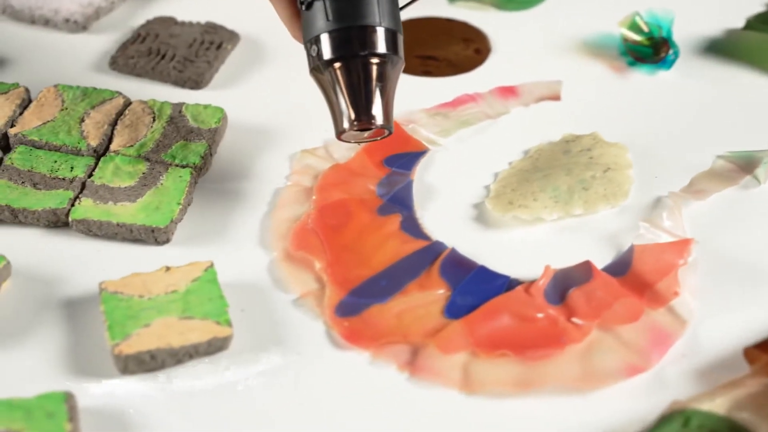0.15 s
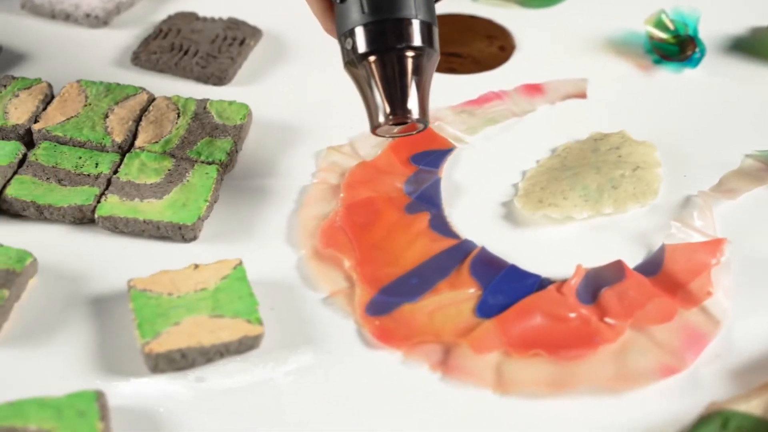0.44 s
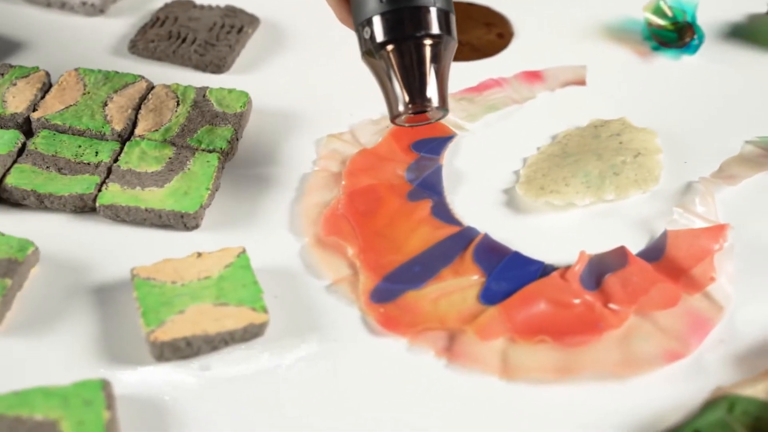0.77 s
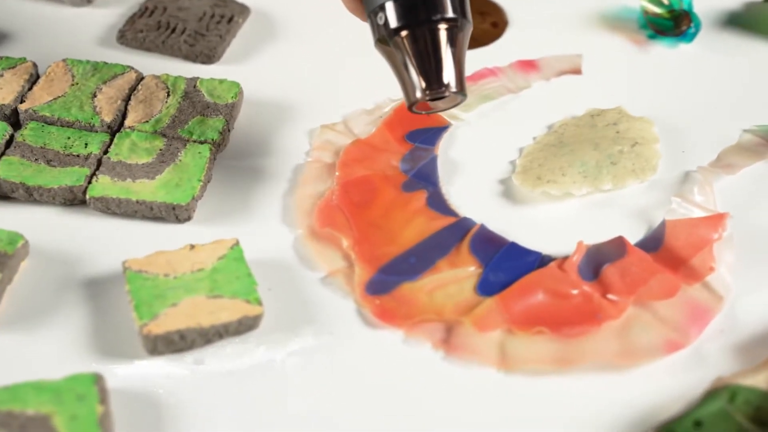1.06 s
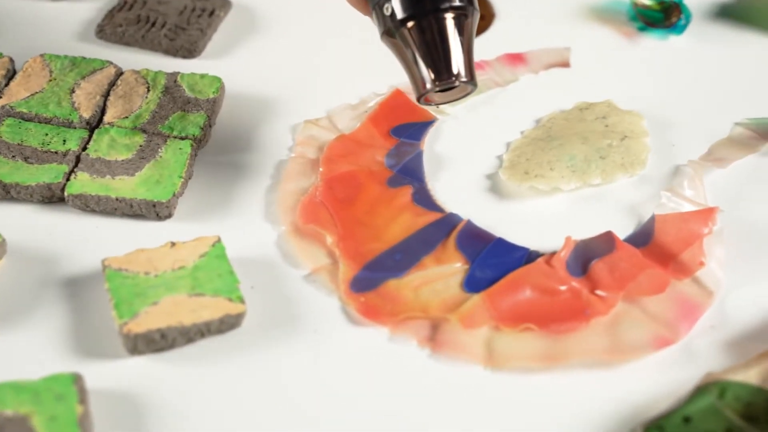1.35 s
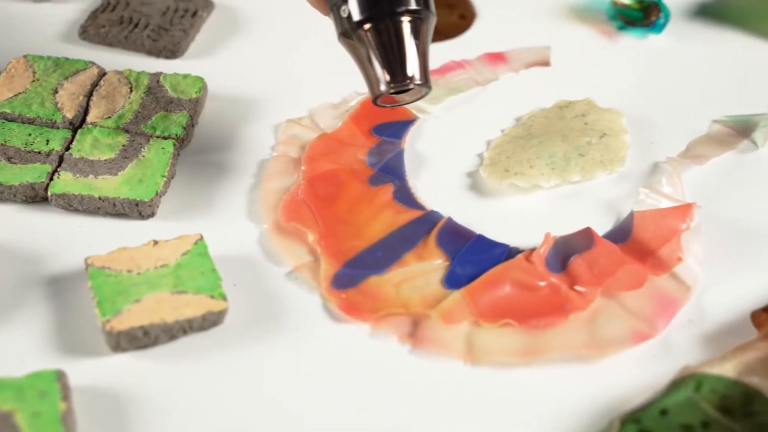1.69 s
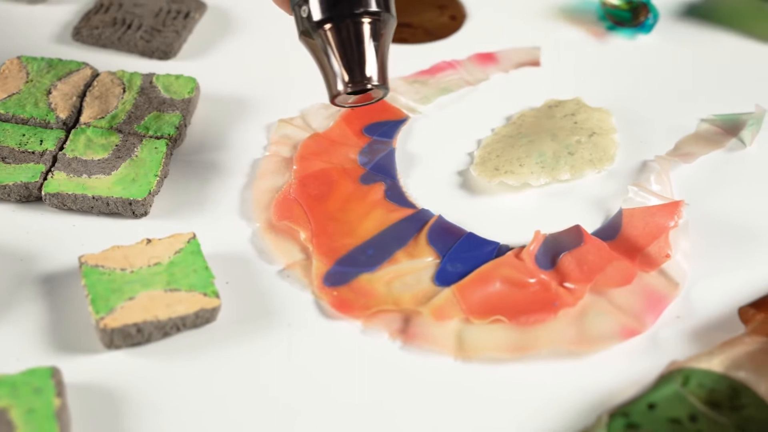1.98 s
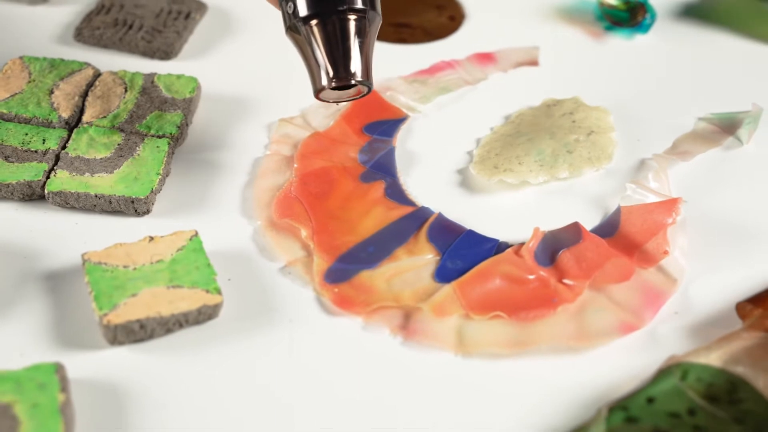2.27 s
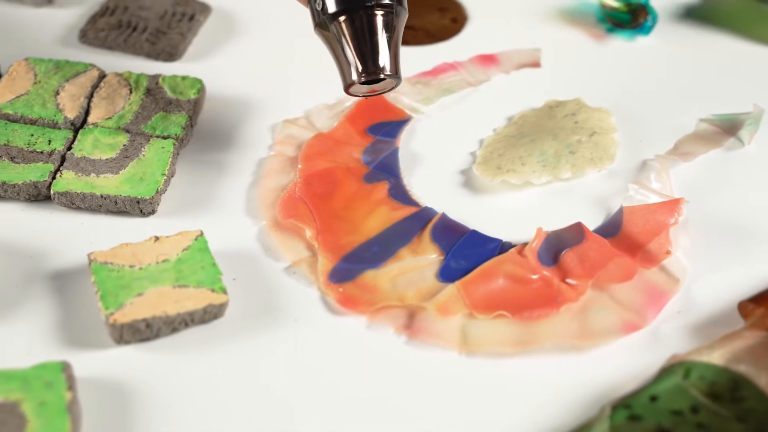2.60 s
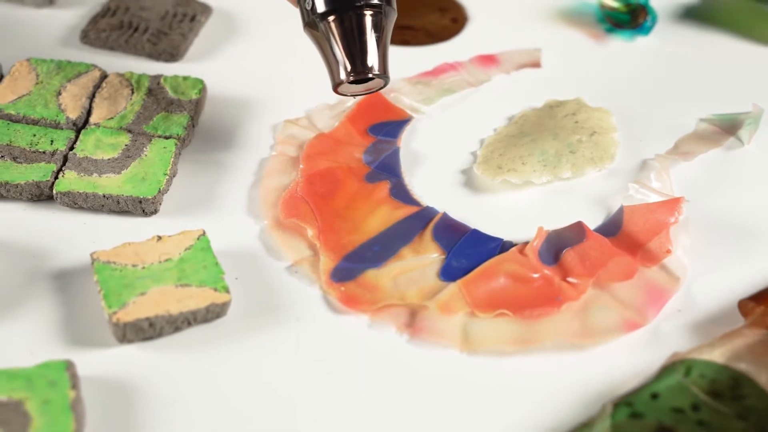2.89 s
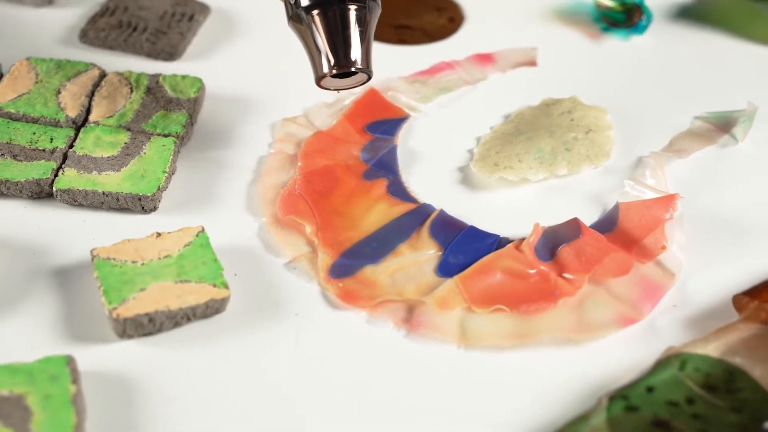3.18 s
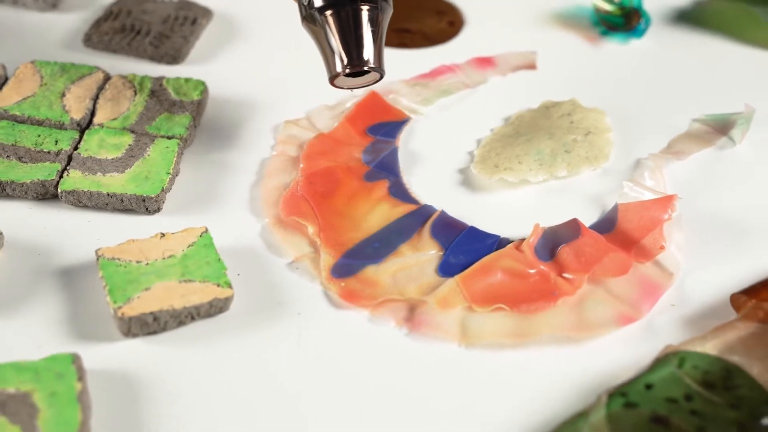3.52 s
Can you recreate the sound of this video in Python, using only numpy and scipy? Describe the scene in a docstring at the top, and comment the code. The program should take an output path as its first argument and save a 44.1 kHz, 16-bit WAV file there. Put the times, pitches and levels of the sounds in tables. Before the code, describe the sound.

A handheld heat gun runs steadily up close, its high fan whine over rushing hot air.

```python
"""At a table top, a handheld heat gun runs steadily, heard close by as it turns slowly away.
A five-bladed fan whines over weaker motor-shaft harmonics, all sines locked to one rotation.
A faint mains hum is a steady sine that fades with the turn.
Air rushes through the barrel and hisses at nozzle and table: shaped noise and narrow noise bands,
coloured by reflections and a short room tail. Most of the air sound grows duller with the turn."""
import sys
import numpy as np
from scipy import signal
from scipy.fft import rfft, irfft
from scipy.io import wavfile

SR = 44100
rng = np.random.default_rng(int(sys.argv[2]) if len(sys.argv) > 2 else 0)


def file_out(sig):
    """Save sig as 16-bit WAV at sys.argv[1]."""
    # one column per channel
    cols = np.atleast_2d(sig).T
    # limit, then scale
    lim = np.clip(cols, -1, 1)
    pcm = np.round(lim * 32767).astype(np.int16)
    wavfile.write(sys.argv[1], SR, pcm)


N = 160965
CUTOFF_HZ = 15800

# Effect of turning the gun. Each row: frequency in Hz, level change in dB per unit of turn.
TURN_COLOUR = [(100, -0.5), (400, -1.5), (650, -0.5), (900, -2), (1120, -4.5), (1350, 0), (1700, -1.9),
               (2200, -1.8), (3000, -3), (4200, -2.2), (6400, -2.5), (8000, -1.6), (14000, -2)]


def from_db(db):
    """Decibels to amplitude gain."""
    return 10 ** (np.asarray(db) / 20)


def rms_one(x):
    """Scale to rms 1."""
    return x / np.sqrt(np.mean(x ** 2) + 1e-20)


def in_time(rows):
    """Interpolate (seconds, value) rows to one value per sample."""
    return np.interp(np.arange(N) / SR, *np.transpose(rows))


def at_hz(points, hz):
    """Interpolate (Hz, dB) rows on a log-frequency axis."""
    points_hz, points_db = np.transpose(points)
    return np.interp(np.log(np.maximum(hz, 1)), np.log(points_hz), points_db)


def drift(rate_hz):
    """Random wandering of rms 1: noise through a two-pole low-pass, run at SR / 40."""
    step = 40
    settle = 2000
    pole = np.exp(-2 * np.pi * rate_hz * step / SR)
    noise = rng.standard_normal(N // step + settle + 2)
    slow = signal.lfilter([1], [1, -2 * pole, pole * pole], noise)[settle:]
    return np.interp(np.arange(N) / step, np.arange(len(slow)), rms_one(slow))


def resonant_noise(hz, width_hz):
    """Noise of rms 1 through a gently sloped second-order Butterworth band-pass."""
    edges_hz = [hz - width_hz / 2, hz + width_hz / 2]
    sos = signal.butter(2, edges_hz, "band", fs=SR, output="sos")
    return rms_one(signal.sosfilt(sos, rng.standard_normal(N)))


def fan(turn):
    """Blade tone and shaft harmonics, phase-locked to one slightly unsteady rotation."""
    # Motor speed. Each row: time in seconds, shaft turns per second.
    speed_curve = [(0, 289.81), (0.4, 290.66), (0.85, 291.54), (1.4, 291.32), (1.9, 291.41), (2.3, 292.34),
                   (2.52, 291.64), (2.95, 293.13), (3.2, 293.23), (3.5, 294.0), (3.65, 293.95)]
    # Blade tone. Each row: time in seconds, level in dB rms before flutter.
    whine_level = [(0, -44), (.12, -44.5), (.42, -48.5), (.7, -47.5), (1, -48), (1.5, -48.9), (1.85, -48),
                   (2.18, -49), (2.34, -45.5), (2.58, -49.5), (2.7, -46.5), (2.95, -46.5), (3.08, -44.1),
                   (3.23, -46), (3.37, -44), (3.65, -46.5)]
    # Shaft harmonics. Each row: multiple of the speed, level in dB rms before roughness and turn.
    orders = [(1, -83), (2, -67), (3, -66), (4, -65.5), (7, -72), (9, -74.5), (10, -74), (14, -85.5),
              (15, -84), (17, -79.5), (19, -79.5), (20, -80.5), (21, -82), (22, -74), (25, -82.5),
              (28, -87), (30, -90), (32, -91), (34, -84.5), (35, -87)]
    blades = 5
    speed_jitter_share, jitter_hz = .0004, 13.8
    whine_flutter_share, flutter_hz = 0.044, 49
    waver_db, waver_hz = 2.0, 1.9
    rough_share, rough_hz = 0.32, 16.5

    speed_hz = in_time(speed_curve) * (1 + speed_jitter_share * drift(jitter_hz))
    angle = 2 * np.pi * np.cumsum(speed_hz) / SR
    flutter = 1 + whine_flutter_share * drift(flutter_hz)
    out = from_db(in_time(whine_level)) * flutter * np.sin(blades * angle)
    for multiple, db in orders:
        phase = round(multiple) * angle + rng.uniform(0, 2 * np.pi)
        # random sine and cosine parts roughen both amplitude and phase
        rough = drift(rough_hz) * np.sin(phase) + drift(rough_hz) * np.cos(phase)
        tone = np.sin(phase) + rough_share * rough
        swell = rms_one(from_db(waver_db * drift(waver_hz)))
        turn_db = turn * at_hz(TURN_COLOUR, multiple * speed_hz.mean())
        out += from_db(db + turn_db) * swell * tone
    return np.sqrt(2) * out  # sine rms to peak


def hum(turn):
    """The motor buzzes faintly at twice the mains frequency, as one sine."""
    buzz_hz, level_db, db_per_turn = 120.1, -81.5, -3.5
    tone = np.sin(2 * np.pi * buzz_hz * np.arange(N) / SR)
    return np.sqrt(2) * from_db(level_db + db_per_turn * turn) * tone


def rush(turn, count=28):
    """Air noise coloured by the barrel; overlapping bands flicker and change level with the turn."""
    # Spectrum before flicker and turn. Each row: frequency in Hz, density in dB per Hz.
    rush_spectrum = [(20, -97), (40, -96), (90, -101), (190, -98.5), (280, -92), (370, -83.5), (460, -77),
                     (660, -76.5), (770, -79), (860, -85), (1000, -80), (1130, -87), (1210, -82),
                     (1400, -77), (1550, -81.5), (1700, -80), (1900, -82.5), (2100, -91), (2750, -91),
                     (3200, -91), (3550, -98), (4250, -104), (4700, -101), (5800, -102.5), (6750, -100.5),
                     (7500, -101.5), (8100, -100.5), (8700, -107), (9200, -106.5), (9700, -109.5),
                     (11000, -111), (11900, -110.5), (15700, -119)]
    turbulence_db, turbulence_hz = 0.46, 5.5

    hz = np.arange(N // 2 + 1) * SR / N
    white = rfft(rng.standard_normal(N)) * np.sqrt(SR / 2)  # density 0 dB per Hz
    air = white * from_db(at_hz(rush_spectrum, hz))
    centres_hz = np.geomspace(150, CUTOFF_HZ, count)
    out = np.zeros(N)
    for centre_hz, share in zip(centres_hz, np.eye(count)):
        # triangular bands that sum to 1
        band = irfft(air * np.interp(hz, centres_hz, share), N)
        turn_db = turn * at_hz(TURN_COLOUR, centre_hz)
        out += band * from_db(turn_db + turbulence_db * drift(turbulence_hz))
    return out


def barrel(turn):
    """The flow excites narrow air resonances of the barrel and housing."""
    # Each row: frequency in Hz, width in Hz, level in dB rms at turn 0, change in dB per unit of turn.
    resonances = [(454, 35, -65.5, 0), (522, 51, -63.5, -1), (704.4, 62, -64, 1.5), (959.5, 32, -67.5, 1.5),
                  (1312, 40, -64, -9), (1754, 46, -63, 1.5), (1838, 36, -61, -3), (2246, 120, -69.5, -0.5),
                  (2487, 30, -76.5, 2), (2596, 68, -72, -2), (3098, 98, -71, -4)]
    out = np.zeros(N)
    for hz, width_hz, db, db_per_turn in resonances:
        out += from_db(db + db_per_turn * turn) * resonant_noise(hz, width_hz)
    return out


def hiss(turn):
    """Noise bands from the nozzle and from the jet striking the table; only the nozzle's follow the turn."""
    # Nozzle. Each row: frequency in Hz, width in Hz, level in dB rms at turn 0.
    nozzle_bands = [(6190, 200, -74.5), (6400, 190, -73)]
    # Jet on the table. Each row: frequency in Hz, width in Hz, relative level in dB.
    jet_bands = [(4950, 430, -1.5), (5467, 340, 0)]
    # Each row: time in seconds, level in dB applied to both jet bands.
    jet_level = [(0, -74), (.6, -70.5), (1.2, -67.5), (1.85, -69.5), (2.3, -78), (2.6, -72), (3, -78),
                 (3.65, -78)]

    nozzle = np.zeros(N)
    for hz, width_hz, db in nozzle_bands:
        turn_db = turn * at_hz(TURN_COLOUR, hz)
        nozzle += from_db(db + turn_db) * resonant_noise(hz, width_hz)
    jet = sum(from_db(db) * resonant_noise(hz, width_hz) for hz, width_hz, db in jet_bands)
    return nozzle + from_db(in_time(jet_level)) * jet


def surroundings(x):
    """Close reflections and a faint decaying-noise room tail ripple the spectrum of the air noise."""
    # Reflections from the table and things nearby. Each row: delay in ms, signed gain.
    echoes = [(3.76, -0.057), (4.84, 0.074), (5.75, 0.028), (7.03, -0.04), (7.91, -0.065), (8.99, -.07),
              (13.72, 0.075), (17.05, .05)]
    room_db, room_t60_s = -18.5, 0.23

    hz = np.arange(N // 2 + 1) * SR / N
    t = np.arange(N) / SR
    near = sum(gain * np.exp(-2j * np.pi * hz * ms / 1000) for ms, gain in echoes)
    decay = from_db(-60 * t / room_t60_s)
    tail = rms_one(rng.standard_normal(N) * decay) / np.sqrt(N)  # unit energy
    response = 1 + near + from_db(room_db) * rfft(tail)
    return irfft(rfft(x) * response, N)


def scene():
    """The running gun in mono; reflections and room act on the air noise only."""
    # Each row: time in seconds, turn (-1 facing to 1 turned away).
    turn_curve = [(0, -1.05), (.5, -0.45), (1, -0.51), (1.6, -.15), (2.1, -0.074), (2.5, .55), (3, 0.73),
                  (3.65, 1)]
    turn = in_time(turn_curve)
    air = rush(turn) + barrel(turn) + hiss(turn)
    return (fan(turn) + hum(turn) + surroundings(air))[None]


def record(dry):
    """Cut the top steeply with a zero-phase elliptic low-pass."""
    sos = signal.ellip(12, .05, 50, CUTOFF_HZ, fs=SR, output="sos")
    return signal.sosfiltfilt(sos, dry)


dry = scene()
out = record(dry)
file_out(out)
```